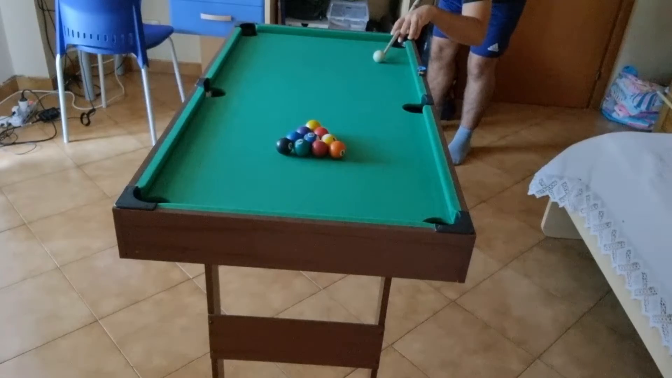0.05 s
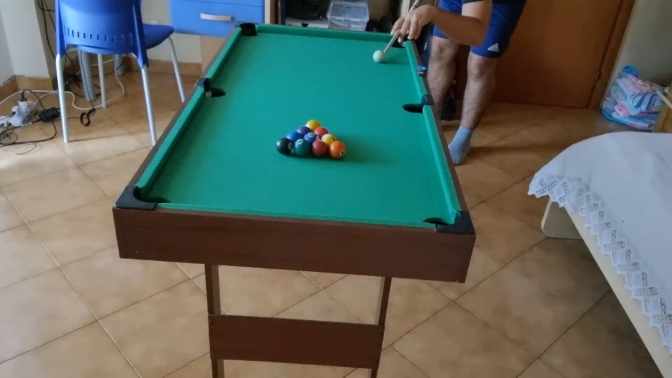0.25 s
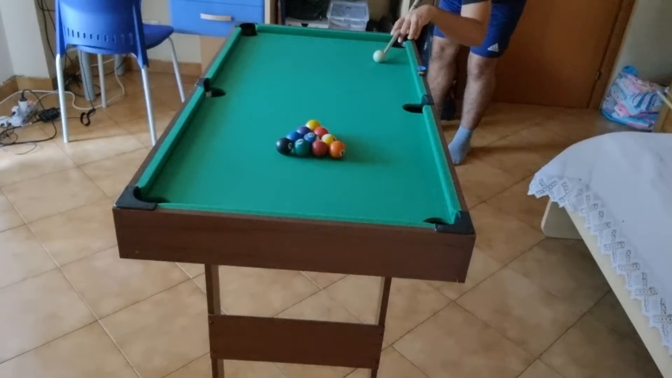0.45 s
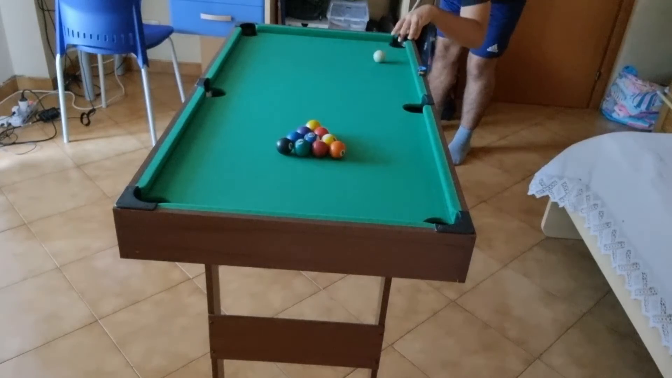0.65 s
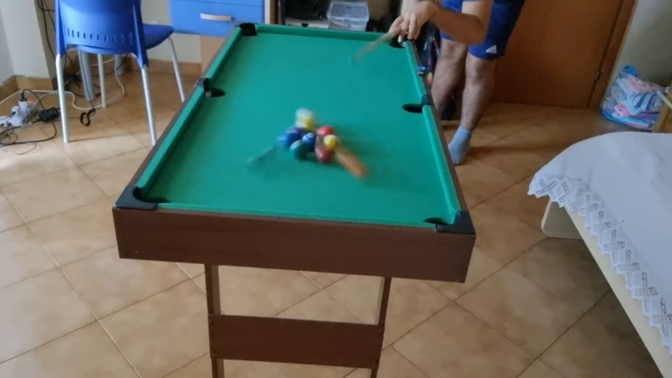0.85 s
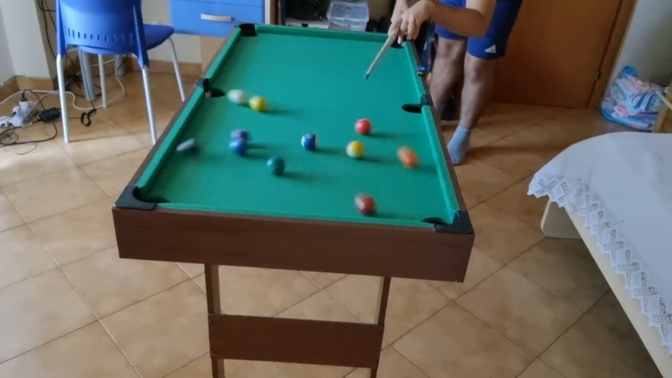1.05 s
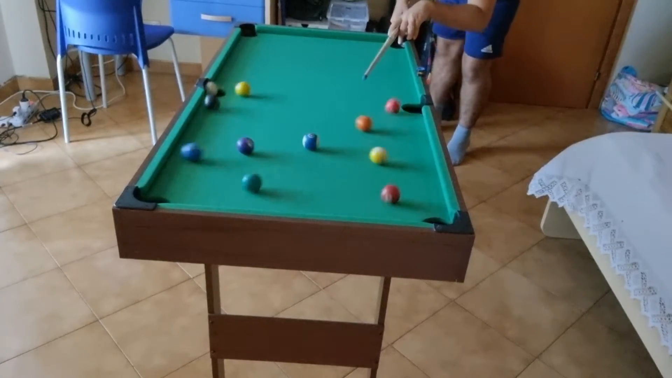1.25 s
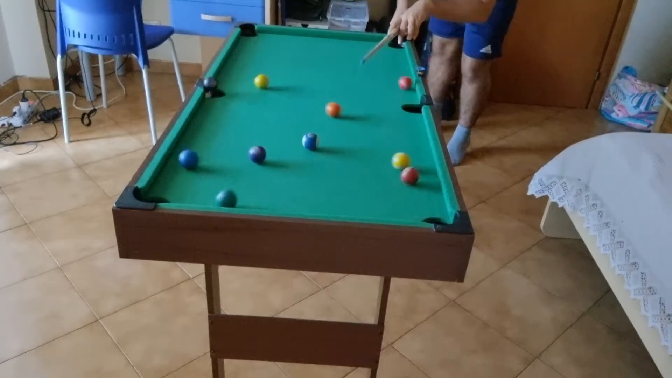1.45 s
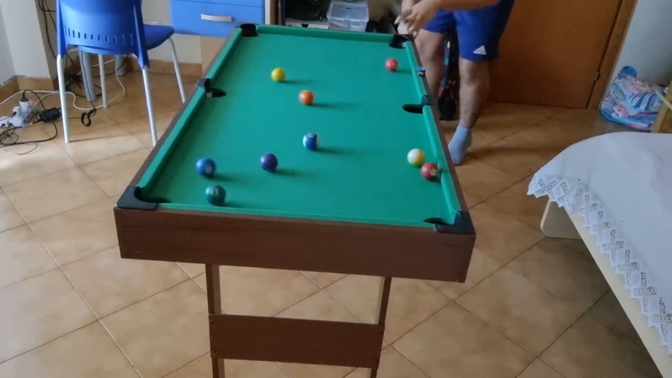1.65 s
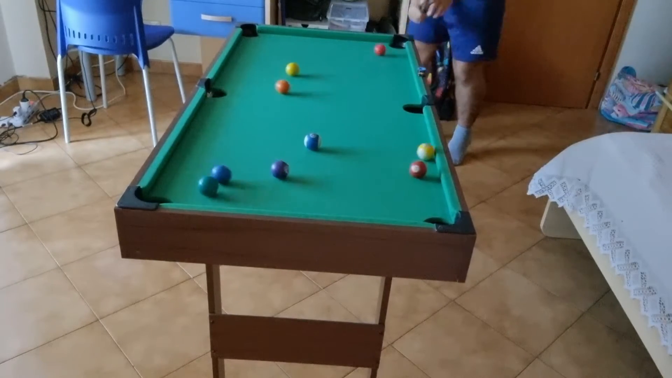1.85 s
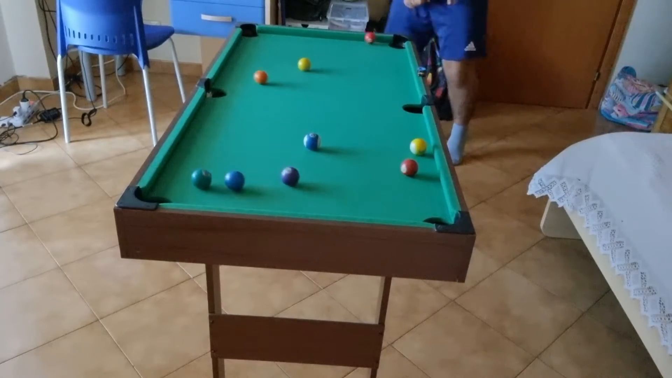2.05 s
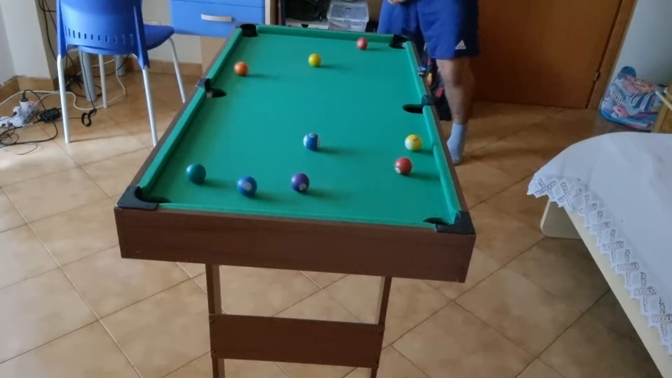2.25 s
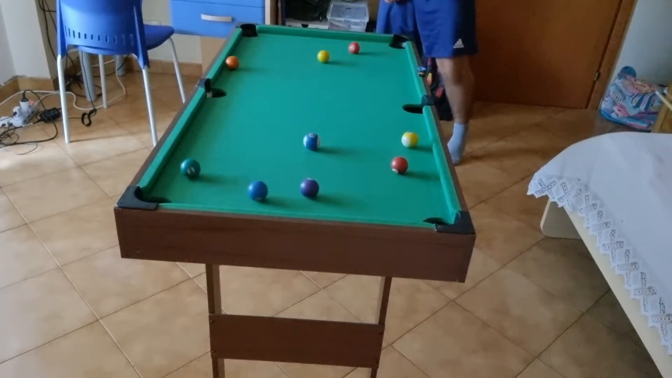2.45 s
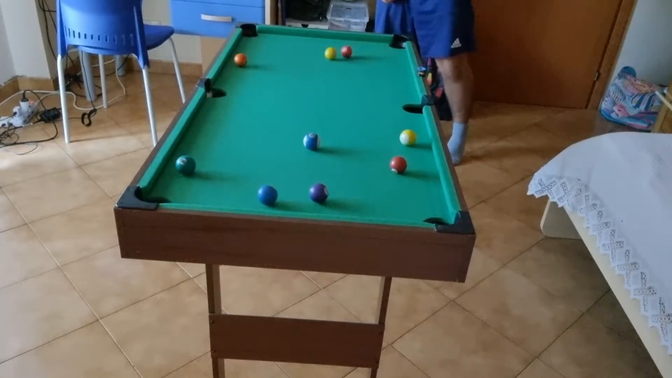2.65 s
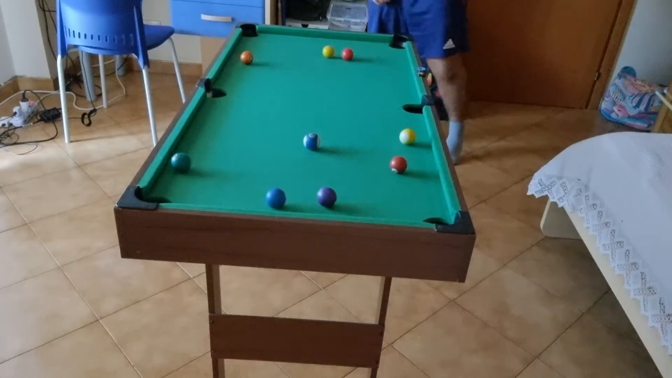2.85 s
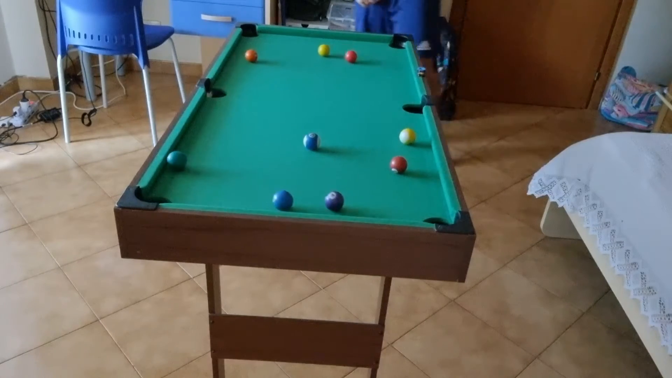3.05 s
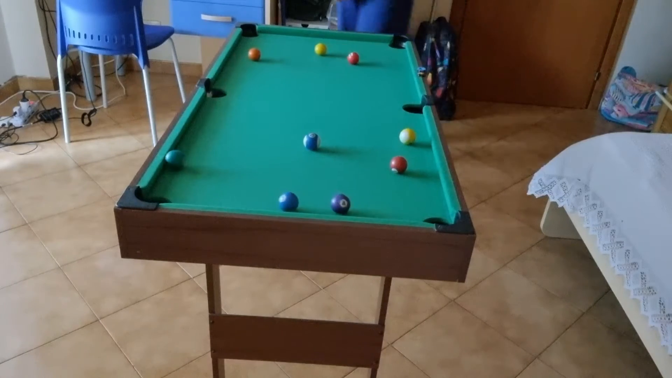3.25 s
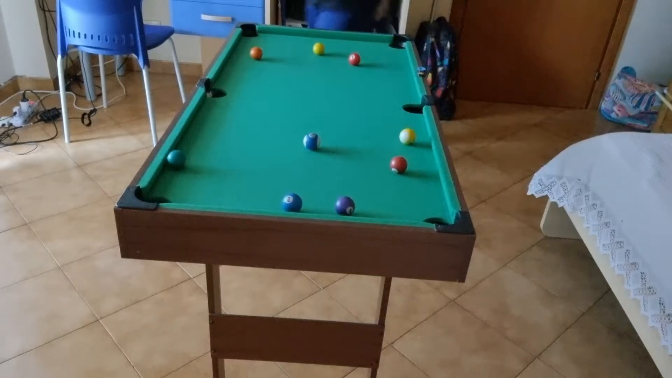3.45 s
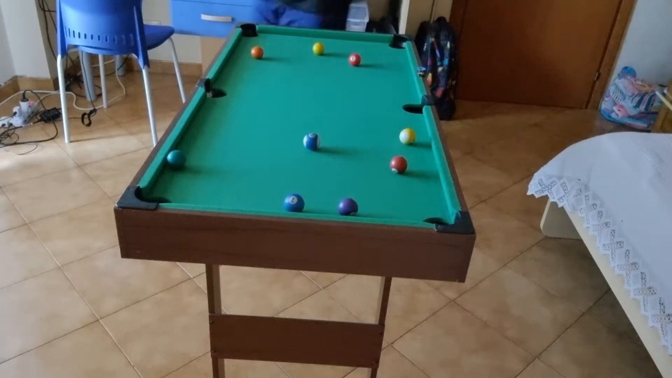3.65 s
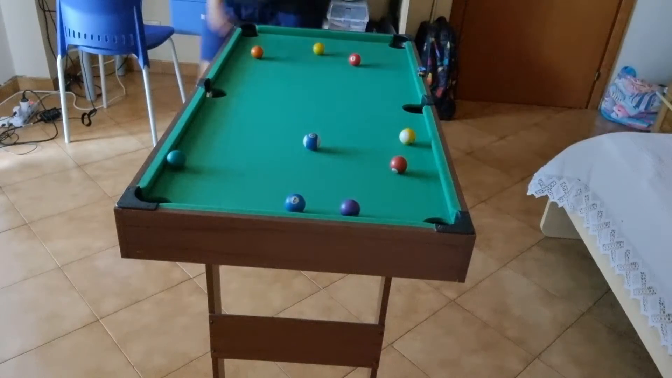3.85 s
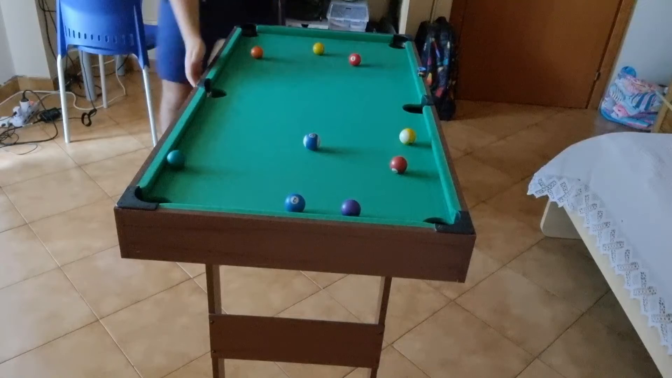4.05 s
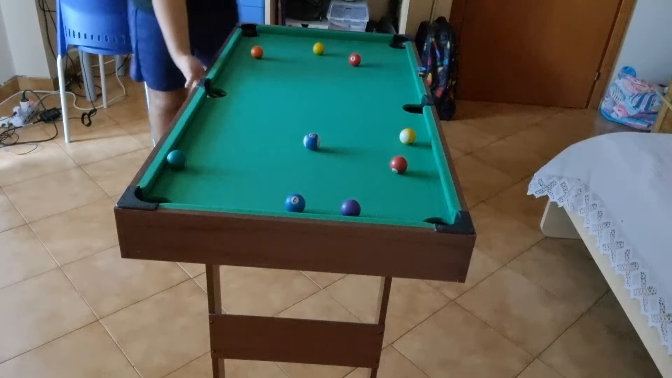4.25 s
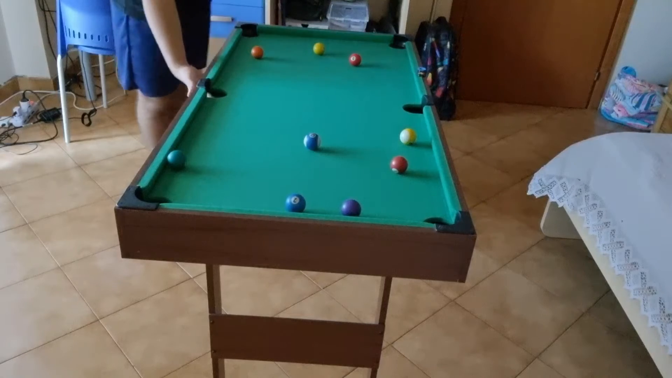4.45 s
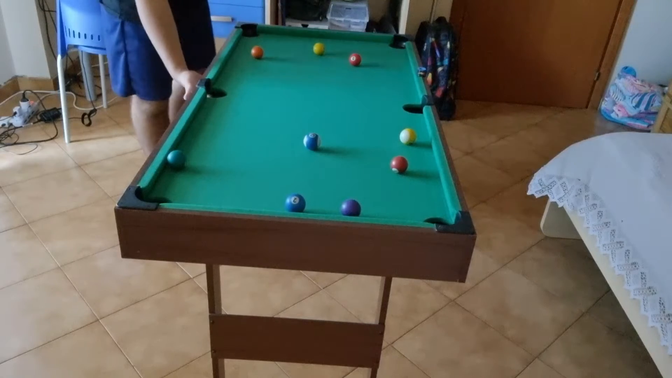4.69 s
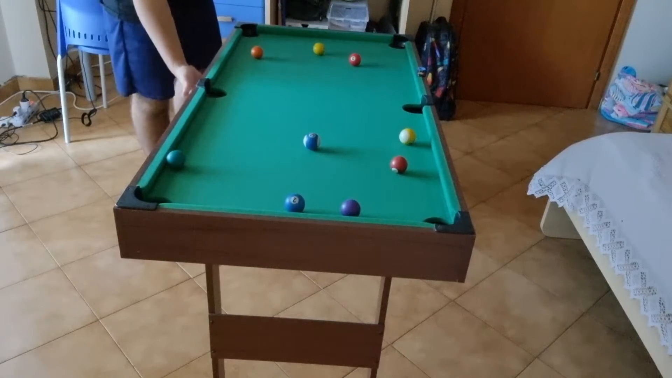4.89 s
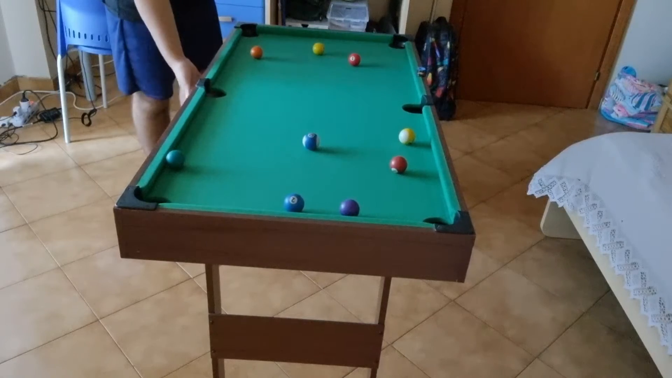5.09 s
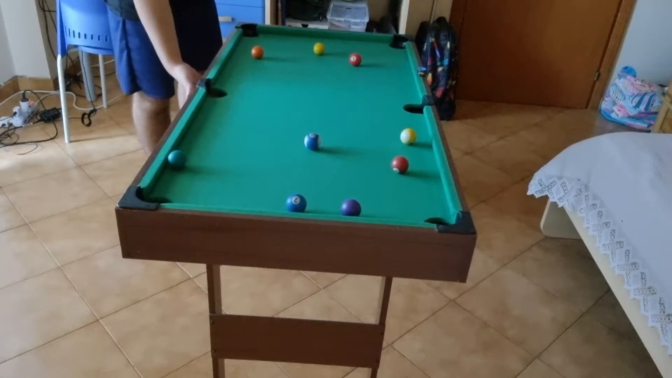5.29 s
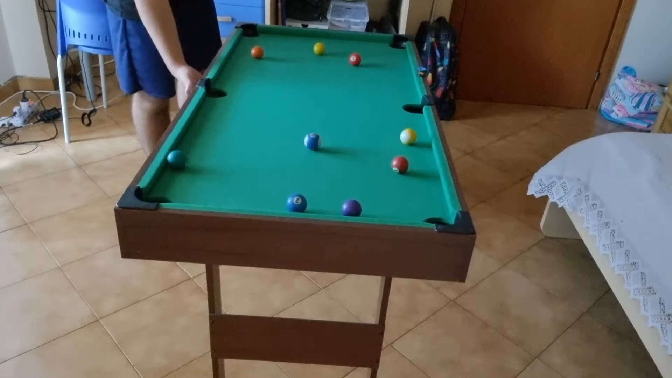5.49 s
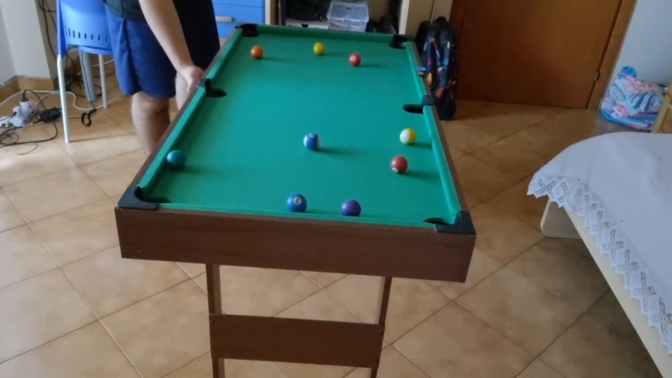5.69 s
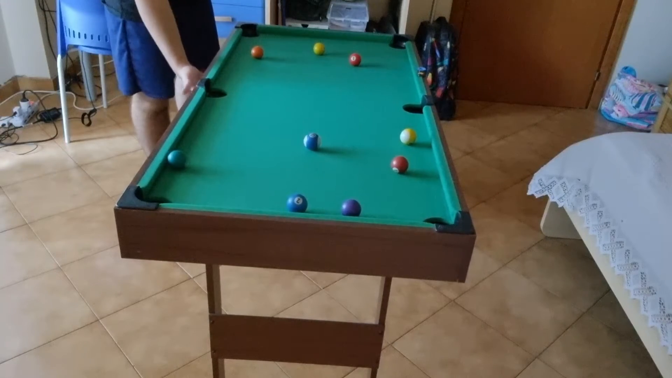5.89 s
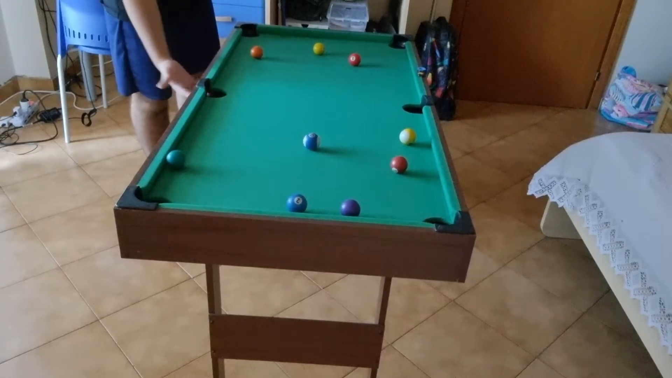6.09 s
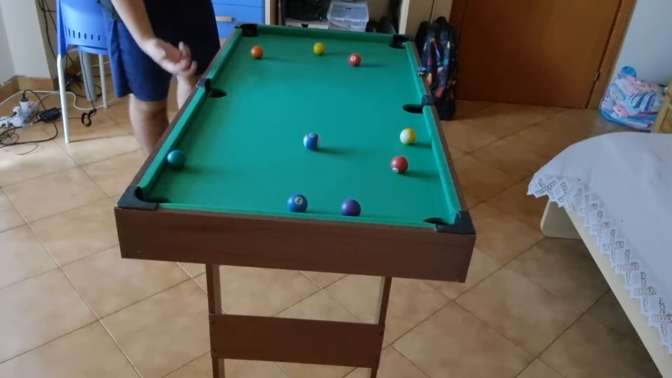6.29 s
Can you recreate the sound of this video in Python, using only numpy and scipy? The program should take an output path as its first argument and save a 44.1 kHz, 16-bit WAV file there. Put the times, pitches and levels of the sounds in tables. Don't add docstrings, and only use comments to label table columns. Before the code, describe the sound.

A small wooden pool table is heard at close range indoors. After near silence comes a short rubbing slide, a sharp cue hit and a bright clattering break. Balls click together and thump cushions and the boxy rails, increasingly sparse over two seconds. Then mostly quiet room hush, a dull floor thud, soft fabric rustle, and muted knocks with a short hollow roll. Hard surfaces add a short bright reverberation.

```python
import sys
import numpy as np
from scipy import signal
from scipy.fft import rfft, irfft, next_fast_len
from scipy.io import wavfile
from scipy.ndimage import uniform_filter1d

SR = 44100
rng = np.random.default_rng(int(sys.argv[2]) if len(sys.argv) > 2 else 0)


def dump_mix(stems):
    frames = np.atleast_2d(stems).T
    limited = np.clip(frames, -1, 1)
    pcm = np.round(limited * 32767).astype(np.int16)
    wavfile.write(sys.argv[1], SR, pcm)


def volts_from_db(level):
    exponent = np.asarray(level, float) / 20
    return 10 ** exponent


N = 279153
STRIKE_S = 0.8228


def click(db, hz, pan_db, wet_db):
    edge = volts_from_db(-23) * wavelet(1.7 * hz, turns=0.4) + volts_from_db(-36.5) * wavelet(4.1 * hz, turns=0.5)
    body = filtered(wavelet(hz, turns=0.6), lambda f: 1 / np.sqrt(1 + (f / (1.75 * hz)) ** 14))
    sound = body + volts_from_db(0.72 * (db + 5.5)) * edge
    return heard(volts_from_db(db) * sound, pan_db, wet_db)


def wavelet(hz, turns):
    u = np.arange(700) / SR * hz - 1.25
    rise = np.exp(-(u / 0.47) ** 2)
    decay = 1 / np.cosh(u / turns)
    swings = np.where(u < 0, rise, decay) * np.cos(2 * np.pi * u)
    return swings * np.clip(2 * (u + 1.25), 0, 1) ** 2


# start in seconds, peak level in dB, click pitch in Hz, #
# left-over-right in dB, room level in dB.
MORE_CLICKS = [
    (.9052, 4.5, 3500, 0, 3),
    (1.2222, -9.5, 3600, .5, -3),
]


def add_rack(mix):
    contacts, first_gap_s, quicken = 7, 0.0019, 0.9
    k = np.arange(contacts)
    times = 0.8932 + first_gap_s * (1 - quicken ** k) / (1 - quicken)
    levels = np.linspace(-14, -3.5, contacts)
    pitches = np.geomspace(4000, 2800, contacts)
    for s, db, hz in zip(times, levels, pitches):
        add(mix, s, click(db, hz, pan_db=0, wet_db=-3))
    for s, *row in MORE_CLICKS:
        add(mix, s, click(*row))


# start in seconds, peak level in dB, click pitch in Hz,
# left-over-right in dB, room level in dB.
BALL_CLICKS = [(0.5605, -53.5, 3560, 9, 6), (0.7363, -45.5, 3350, -1, 2), (0.768, -37, 3300, 5, 0.5),
               (0.9255, -10, 3460, -3.5, 1.5), (0.9328, -9.5, 4067, -6, 8.5), (0.9433, -15, 3653, 10, -1),
               (1.1696, -20.5, 3674, 4, 7.5), (1.1782, -19, 4030, 0, -2), (1.2588, -29.5, 3850, 7, 15),
               (1.4415, -21.5, 3340, 0, -3), (1.5822, -19, 3570, -0.5, -3.5),
               (2.1033, -56.5, 3563, 10, 6.5), (2.7829, -29.5, 3830, -0.5, 1.5), (2.789, -33, 2980, 2, 7.5),
               (3.0082, -48, 2960, 5.5, 1.5), (3.24, -63, 3300, 2.5, 6)]


def add_ball_clicks(mix):
    for s, *row in BALL_CLICKS:
        add(mix, s, click(*row))


# pitch in Hz, level in dB, time to fall 60 dB in seconds.
BOX_MODES = [(170.37, -9.5, 0.13), (276, -7, 0.077), (345, -8, .09), (455, -5, .09), (553, -2.5, 0.086),
             (673, -10.5, 0.078), (773.2, -1, 0.061), (900, -1, 0.055), (1089, -3.5, 0.054),
             (1204, -10, 0.083), (1389.6, -3.5, 0.048), (1412, -11.5, 0.051), (2113, -7, 0.043),
             (2390, -11, 0.036), (3350, 4, 0.019)]
# frequency in Hz, level in dB.
TICK_COLOUR = [(500, -38), (1300, 5.5), (2200, 1), (3400, 5), (4800, 3), (8000, -22), (12000, -29.5),
               (15500, -31)]


def knock(db, hz, tick_db, ring_db, wet_db):
    t = np.arange(3600) / SR
    u = 1.175 * 2 * np.pi * hz * t[:1500]
    blow = np.diff(u ** 4 * np.exp(-u), 2)

    box = np.zeros(len(t))
    for f, mode_db, t60 in BOX_MODES + BOX_MODES:
        swing = np.sin(2 * np.pi * (f * rng.uniform(0.92, 1.08) * t + rng.random()))
        fade = volts_from_db(mode_db - 60 * t / min(t60, 0.06, 60 / f))
        box += fade * swing * rng.uniform(0.65, 1)
    box = signal.fftconvolve(box * np.minimum(t / 0.0035, 1), blow)[:len(t)]
    sound = volts_from_db(ring_db) * box / abs(box).max()
    add(sound, 0.001, volts_from_db(-3) * blow / abs(blow).max())

    chatter = 0.06 * volts_from_db(-60 * t[:900] / 0.004) * rng.standard_normal(900)
    chatter[0] = 1

    def tick_gain(f):
        harder_is_brighter = (db + 12) * np.clip(f / 10000, 0, 1)
        return volts_from_db(read(TICK_COLOUR, f) + harder_is_brighter)

    tick = filtered(np.roll(chatter, 70), tick_gain)
    add(sound, 0, volts_from_db(tick_db) * tick / abs(tick).max())
    return heard(volts_from_db(db) * sound, 0, wet_db)


# start in seconds, #
# peak level in dB, blow pitch in Hz, tick level in dB, ring level in dB.
KNOCKS_ON_WOOD = [(0.607, -51, 980, -31, 5), (0.8211, -3, 737, -6, -13.5), (1.105, -23.5, 817, -2.5, 2),
                  (1.18, -22, 648, 1.5, -13.5), (1.236, -22.5, 996, -20, -3.5),
                  (1.309, -12, 888, -31, -8.5), (1.438, -14, 802, -36, -2), (1.565, -24, 685, -10.5, -1.5),
                  (1.758, -17.5, 830, 3, -1.5), (1.862, -29, 703, -13.5, -14),
                  (2.1565, -23, 1063, -18.5, -5), (2.375, -28.5, 918.2, -26, -2.5),
                  (2.689, -42.5, 913, -34, -0.5), (4.303, -40.5, 856, -11, -1.5),
                  (4.310, -36.5, 815, -21, -8), (4.599, -60, 897, -16.5, -3), (4.659, -62, 772, -18, 0.5),
                  (4.954, -38, 894, -22, -1.5), (4.959, -35.5, 946, -21, -1.5), (5.038, -48, 1070, -8, -2),
                  (5.235, -27.5, 912, -28, -3), (5.243, -30, 850, -10, -2), (5.799, -63.5, 990, -22, -11),
                  (6.175, -60, 968, -9, -5)]


def add_knocks(mix):
    for s, db, hz, tick_db, ring_db in KNOCKS_ON_WOOD:
        add(mix, s, knock(db, hz, tick_db, ring_db, wet_db=1.5 + 0.0159 * db))


# start in seconds, peak level in dB, blow pitch in Hz,
# ring level in dB.
CUSHION_THUDS = [(0.879, -26, 133, -10), (0.967, -42, 135, 0), (0.99, -30, 347, 4),
                 (1.008, -23.5, 323, -11.5), (1.262, -25, 320, -11), (1.423, -32.5, 258, 0),
                 (1.719, -24, 261, -3), (2.06, -49, 102, -10), (2.16, -31, 398, -2), (4.309, -52.5, 256, 1),
                 (5.24, -46.5, 353, -1)]


def add_thuds(mix):
    for s, db, hz, ring_db in CUSHION_THUDS:
        add(mix, s, knock(db, hz, -21, ring_db, wet_db=3))


# frequency in Hz, level in dB.
CRACK_COLOUR = [(800, -26.5), (1800, -11), (3500, -5), (5500, -8), (8000, -9.5), (12000, -16), (15800, -23)]


def crack(db):
    t = np.arange(6000) / SR
    burst = evened(filtered(rng.standard_normal(len(t)), lambda f: volts_from_db(read(CRACK_COLOUR, f))))
    fade = volts_from_db(db - 60 * t / 0.063)
    return heard(fade * burst * np.minimum(t / 0.0027, 1), 0.3, wet_db=2.5)


# start in seconds, level in dB.
RIM_RATTLES = [
    (.935, -40),
    (.985, -45),
    (1.441, -57),
    (1.76, -46),
    (2.157, -60.5),
]


def add_cracks(mix):
    add(mix, STRIKE_S, crack(-17))
    for s, db in RIM_RATTLES:
        add(mix, s, crack(db))


# pitch in Hz, width in Hz, level in dB.
SHAFT_PEAKS = [(345, 32, -3), (1070, 130, -10.5), (1160, 100, -1.5), (1620, 22, -14.5), (2370, 16, -15),
               (3300, 150, -17)]


def cue_slide():
    t = np.arange(N) / SR
    growing_db = -36 - 105 * np.maximum(STRIKE_S - t, 0)
    stopping_db = 1000 * np.maximum(t - STRIKE_S, 0)
    start = np.clip((t - 0.523) / 0.06, 0, 1)
    return noise(humps(SHAFT_PEAKS)) * volts_from_db(growing_db - stopping_db) * start * lumps(700, 0.7)


# time of full level in seconds, level in dB, rise in seconds,
# hold in seconds, fade in dB per second.
ROLLS = [
    (.99, -51.5, .2, 0.15, 11),
    (1.65, -41.5, 0.35, 0.0038, 172),
    (2.2, -58.5, 0.49, .02, 56.5),
]
# frequency in Hz, level in dB per Hz.
BED_COLOUR = [(24, -24), (40, -14.5), (107, 0), (218, 0.5), (303, 0), (373, -1), (565, 0), (1030, -16),
              (1130, -13), (2140, -28.5), (2500, -31), (3250, -55), (5500, -120)]


def rolling():
    return noise(lambda f: volts_from_db(read(BED_COLOUR, f))) * strokes(ROLLS) * lumps(900, 0.93)


# time of full level in seconds, level in dB, rise in seconds,
# hold in seconds, fade in dB per second.
CHANNEL_ROLLS = [
    (5.388, -54.5, 0.17, 0.0062, 150),
    (5.59, -56.5, 0.11, .02, 41.47),
]
# pitch in Hz, width in Hz, level in dB.
CHANNEL_PEAKS = [(419, 12, -4), (734, 42, -22), (962, 9.8, -20), (1249, 50, -20.5), (2140, 43, -30)]


def pocket_channel():
    return noise(humps(CHANNEL_PEAKS)) * strokes(CHANNEL_ROLLS) * lumps(600, 0.64)


# start in seconds, peak level in dB.
HEEL_STEPS = [
    (3.515, -63),
    (4.022, -37.5),
]
# pitch in Hz, level in dB, time to fall 60 dB in seconds.
FLOOR_MODES = [(47.4, 1.5, 0.89), (63.5, -22.5, .3), (100.3, -5, 0.68), (127, -8.5, 0.45)]


def add_heels(mix):
    t = np.arange(SR // 2) / SR
    boom = sum(volts_from_db(db - 60 * t / t60) * np.sin(2 * np.pi * f * t) for f, db, t60 in FLOOR_MODES)
    boom = boom / abs(boom).max() * np.minimum(t / 0.016, 1)
    for s, db in HEEL_STEPS:
        add(mix, s, volts_from_db(db) * boom * np.ones((2, 1)))


# time of full level in seconds, level in dB, rise in seconds,
# hold in seconds, fade in dB per second.
CLOTH_BRUSHES = [
    (3.448, -71, 0.0268, 0.055, 301.7),
    (3.556, -73, 0.052, .02, 60.55),
    (4.136, -72, 0.071, .1, 60),
    (4.31, -68.5, 0.22, 0.17, 84.6),
    (5.066, -75.5, 0.096, .005, 115),
    (6.056, -90, .1, .005, 201.3),
    (6.18, -84, .01, .005, 200),
]
# frequency in Hz, level in dB per Hz.
CLOTH_COLOUR = [(880, -75), (1500, 0), (1560, -3), (1740, -3.5), (3020, 3), (3640, 0.5), (5510, 0.5),
                (9850, -14), (12200, -15), (15800, -18)]


def cloth():
    return noise(lambda f: volts_from_db(read(CLOTH_COLOUR, f))) * strokes(CLOTH_BRUSHES) * lumps(400, 0.9)


# frequency in Hz, level in dB per Hz.
HUSH_COLOUR = [(18, -28.5), (30, -7), (108, -9), (183, -12), (220, -7.5), (258, -18), (326, -9.5),
               (382, -15), (551, -18), (628, -25), (1030, -23), (2210, -32.5), (15800, -60)]
# frequency in Hz, likeness (held within 0 to 1).
HUSH_LIKENESS = [(60, 0.98), (180, 0.97), (550, 0.46), (1650, -1.2), (4970, 0.98), (15000, -0.29)]


def hush():
    return volts_from_db(-65.5) * noise(lambda f: volts_from_db(read(HUSH_COLOUR, f)), HUSH_LIKENESS) * lumps(4000, 1.1)


# delay in seconds, level in dB.
NEAR_WALLS = [
    (.0009, -3),
    (.0058, -8),
    (.009, -13),
    (.0135, -14),
]


def heard(sound, pan_db, wet_db):
    early = np.zeros((2, 1200))
    early[:, 0] = 1
    for s, db in NEAR_WALLS:
        sideways = rng.integers(0, 1 + int(s * 1000), 2)
        at = int(s * SR * rng.uniform(0.9, 1.1)) + sideways
        early[[0, 1], at] = volts_from_db(db) * rng.choice([-1, 1])
    result = volts_from_db(wet_db) * signal.fftconvolve(sound[None], room_tail(), axes=1)
    near = panned(sound, np.clip(pan_db, -4, 4))
    add(result, 0, signal.fftconvolve(near, early, axes=1))
    return result


def panned(x, pan_db):
    delay = round(2.5 + pan_db / 2)
    return np.array([x, np.roll(x, delay)]) * volts_from_db([[pan_db / 2], [-pan_db / 2]])


# frequency in Hz, time to fall 60 dB in seconds.
ROOM_T60 = [(150, 0.83), (400, 0.44), (1000, 0.39), (2800, 0.4), (7000, 0.33), (11000, 0.15),
            (15000, 0.096)]
# frequency in Hz, likeness from 0 to 1.
ROOM_LIKENESS = [(60, .92), (130, .97), (300, .78), (600, .35), (1200, .3), (3000, .15), (5000, 0),
                 (10000, 0)]
LAG = 4


def room_tail():
    size = SR // 2
    taps = rng.standard_normal((2, size)) * (rng.random((2, size)) < 0.15)
    hz, t, z = signal.stft(taps, SR, nperseg=256)
    like = read(ROOM_LIKENESS, hz)[:, None]
    mid, side = z[0] * np.sqrt(1 + like), z[1] * np.sqrt(1 - like)
    fading = np.array([mid + side, mid - side]) * volts_from_db(-60 * t / read(ROOM_T60, hz)[:, None])
    tail = signal.istft(fading, SR, nperseg=256)[1][:, :size]
    tail = tail * np.clip((np.arange(size) / SR - 0.004) / 0.0061, 0, 1)
    return np.array([np.roll(tail[0], LAG), tail[1]]) / np.linalg.norm(tail[0])


def strokes(rows):
    t = np.arange(N) / SR
    power = np.zeros(N)
    for s, db, rise, hold, fade in rows:
        below_db = 20 * np.maximum(s - t, 0) / rise + fade * np.maximum(t - s - hold, 0)
        power += volts_from_db(2 * (db - below_db))
    return np.sqrt(power)


def lumps(size, db):
    return volts_from_db(db * evened(uniform_filter1d(rng.standard_normal(N), size)))


def humps(peaks):
    def gain(hz):
        power = sum(volts_from_db(2 * db) / (1 + ((hz - f) / (1.1 * width)) ** 2) for f, width, db in peaks)
        return np.sqrt(power / (1 + (hz / 5000) ** 4))
    return gain


def noise(gain, likeness=ROOM_LIKENESS):
    return evened(filtered(pair(rng.standard_normal((2, N)), likeness), gain))


def pair(x, likeness):
    def like(hz):
        return np.clip(read(likeness, hz), 0, 1)
    mid = filtered(x[0], lambda hz: np.sqrt((1 + like(hz)) / 2))
    side = filtered(x[1], lambda hz: np.sqrt((1 - like(hz)) / 2))
    return np.array([np.roll(mid + side, LAG), mid - side])


def filtered(x, gain):
    size = next_fast_len(x.shape[-1])
    spectrum = rfft(x, size) * gain(np.fft.rfftfreq(size, 1 / SR))
    return irfft(spectrum, size)[..., :x.shape[-1]]


def read(points, hz):
    f, value = np.transpose(points)
    return np.interp(np.log(hz + 1), np.log(f + 1), value)


def evened(x):
    return x / np.sqrt(np.mean(x ** 2) + 1e-20)


def add(mix, s, sound):
    part = mix[..., round(s * SR):][..., :sound.shape[-1]]
    part += sound[..., :part.shape[-1]]


def scene():
    mix = cue_slide() + rolling() + pocket_channel() + cloth() + hush()
    add_rack(mix)
    add_ball_clicks(mix)
    add_knocks(mix)
    add_thuds(mix)
    add_cracks(mix)
    add_heels(mix)
    return mix


def low_pass(x):
    return signal.sosfilt(signal.butter(12, 15750, fs=SR, output="sos"), x)


def record(dry):
    def microphone(hz):
        bass_cut = hz ** 2 / np.sqrt(hz ** 4 + 35.0 ** 4)
        return bass_cut * np.clip((15900 - hz) / 200, 0, 1)

    dry = filtered(dry, microphone)
    peak_db = 20 * np.log10(abs(dry).max(0) + 1e-9)
    fall = np.arange(N) * 240.0 / SR
    held_db = np.maximum.accumulate(peak_db + fall) - fall
    over_db = np.maximum(held_db + 3.5, 0)
    lagging_db = signal.lfilter([0.01], [1, 0.01 - 1], over_db)
    mix = np.tanh(dry / volts_from_db(1.7 * lagging_db))
    return low_pass(mix)


dry = scene()
out = record(dry)
dump_mix(out)
```